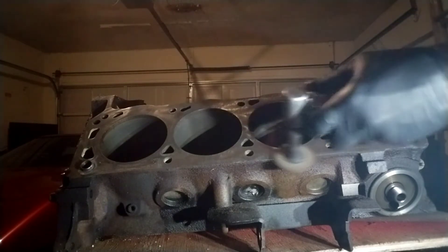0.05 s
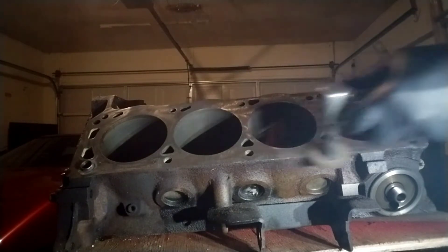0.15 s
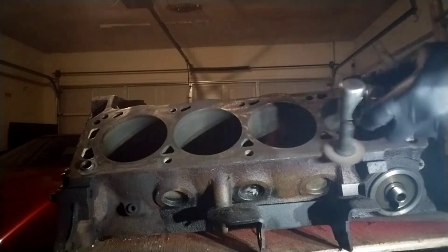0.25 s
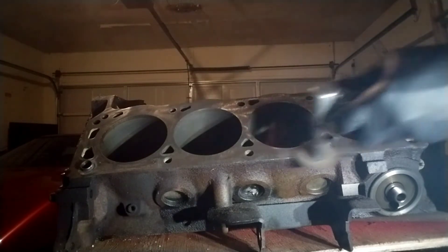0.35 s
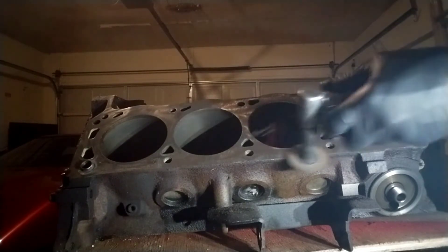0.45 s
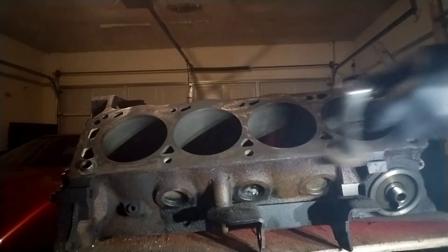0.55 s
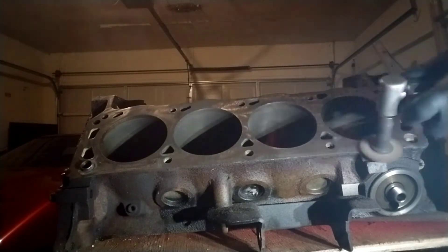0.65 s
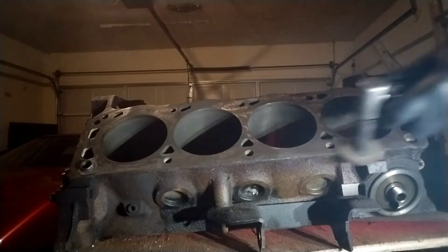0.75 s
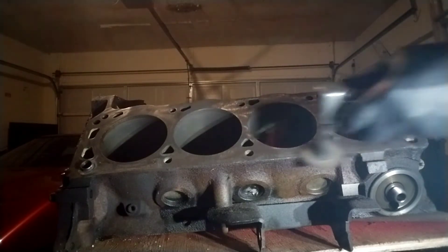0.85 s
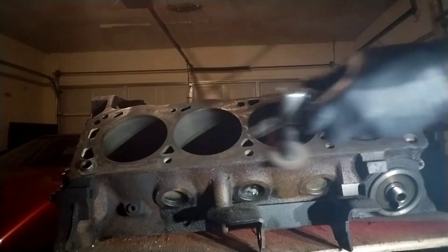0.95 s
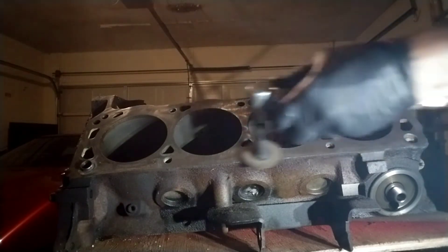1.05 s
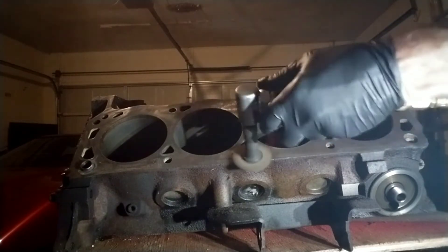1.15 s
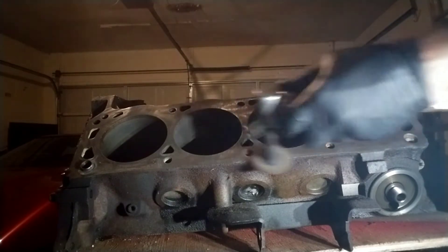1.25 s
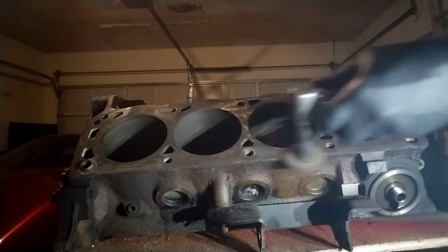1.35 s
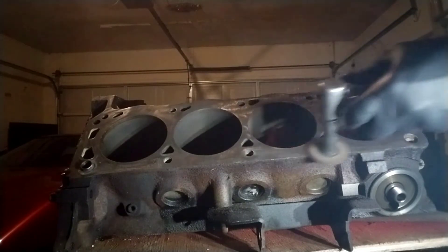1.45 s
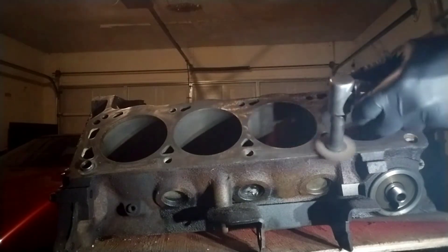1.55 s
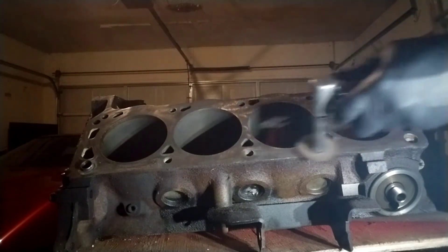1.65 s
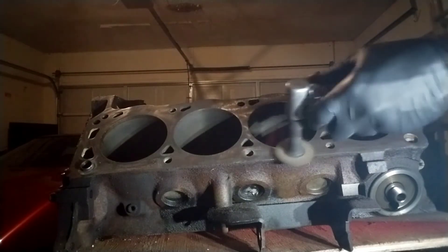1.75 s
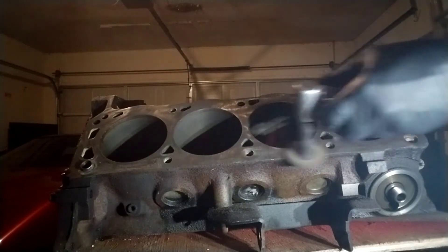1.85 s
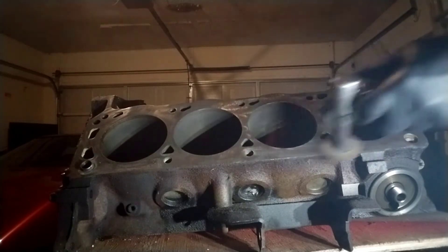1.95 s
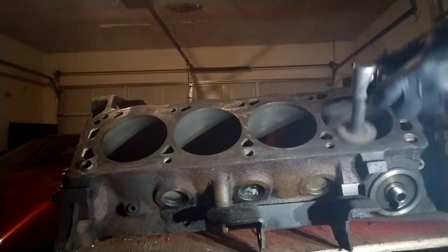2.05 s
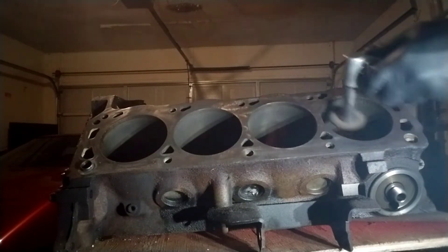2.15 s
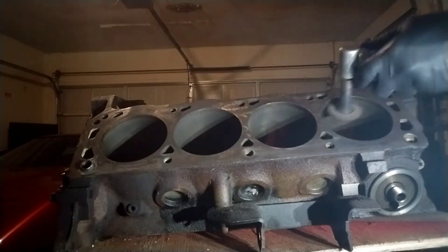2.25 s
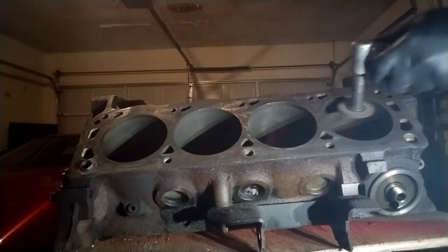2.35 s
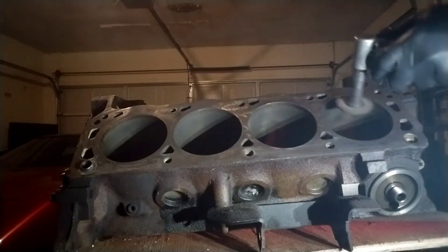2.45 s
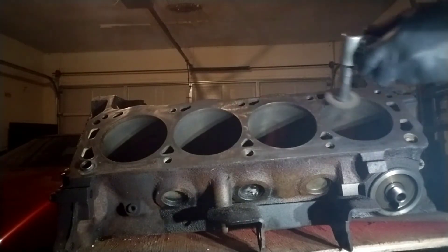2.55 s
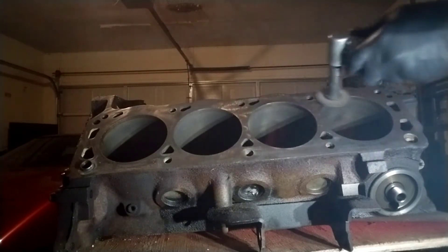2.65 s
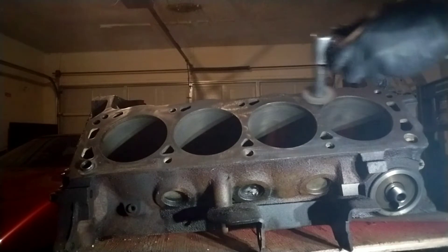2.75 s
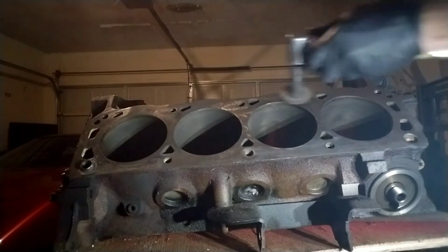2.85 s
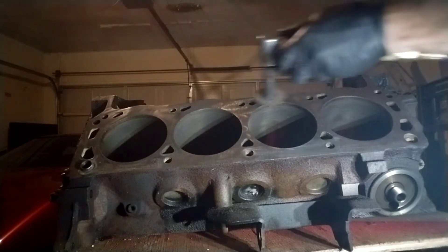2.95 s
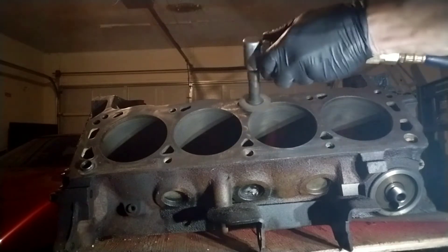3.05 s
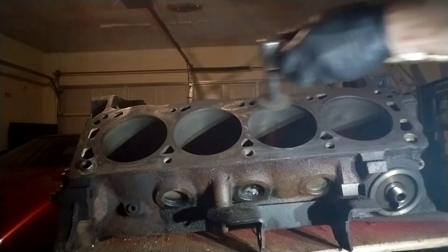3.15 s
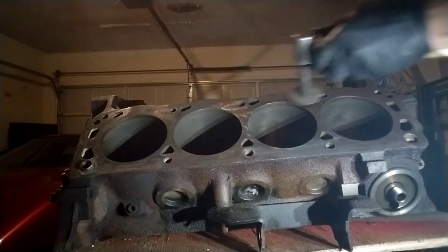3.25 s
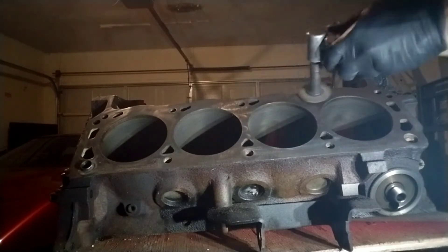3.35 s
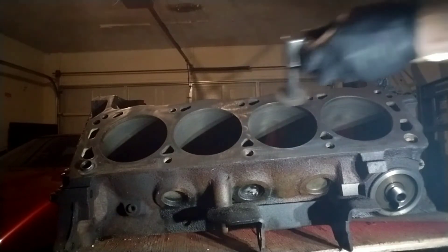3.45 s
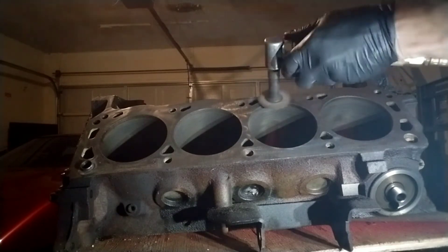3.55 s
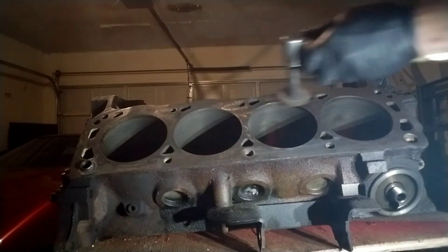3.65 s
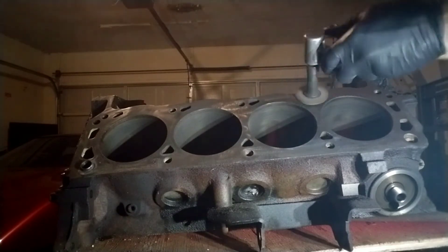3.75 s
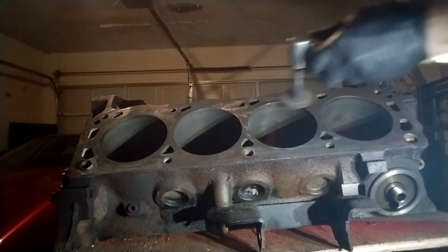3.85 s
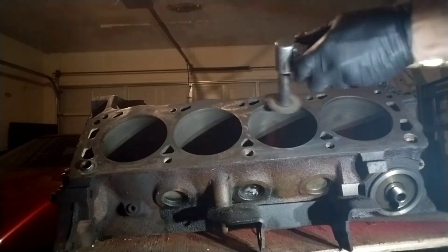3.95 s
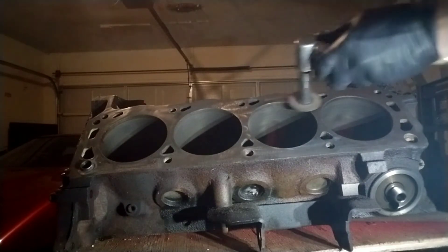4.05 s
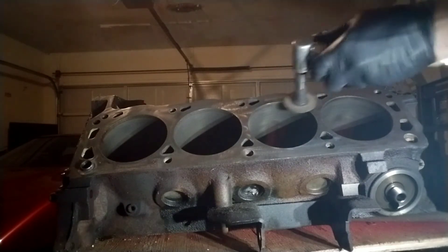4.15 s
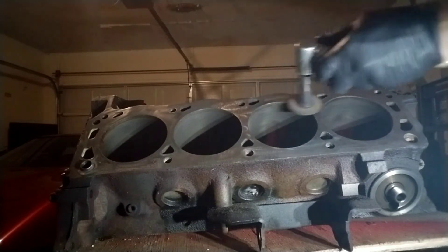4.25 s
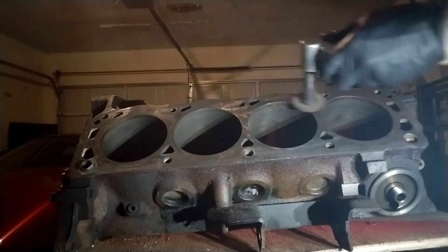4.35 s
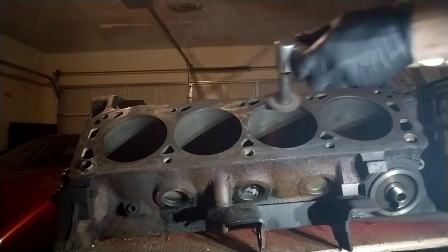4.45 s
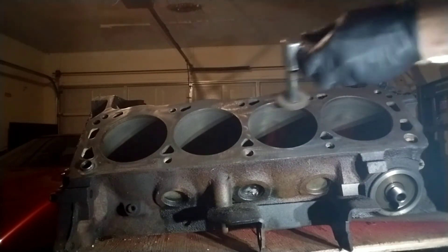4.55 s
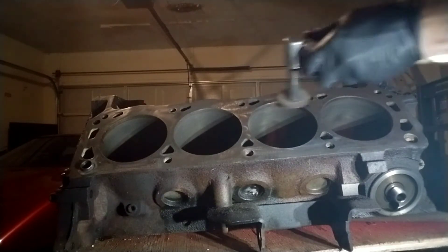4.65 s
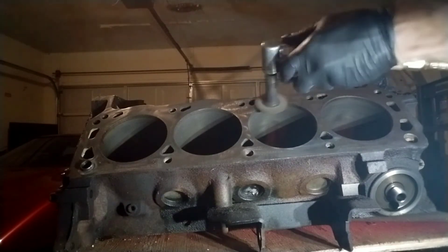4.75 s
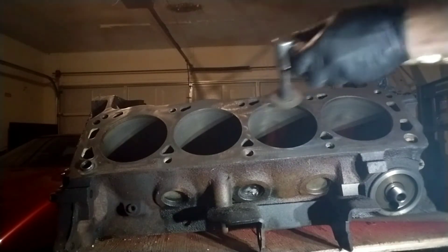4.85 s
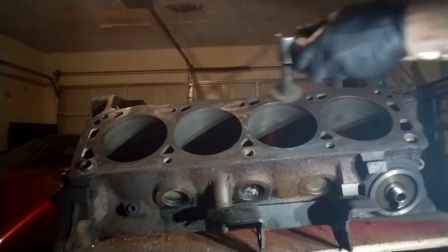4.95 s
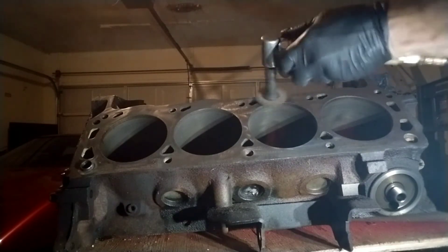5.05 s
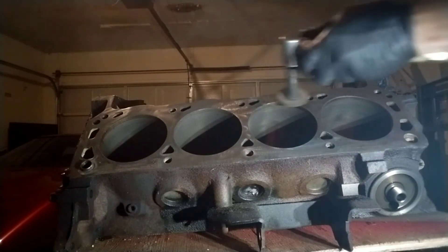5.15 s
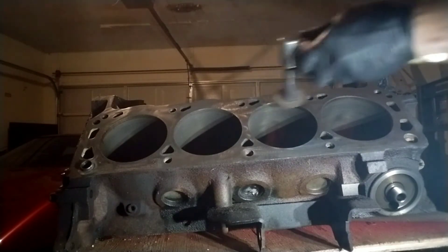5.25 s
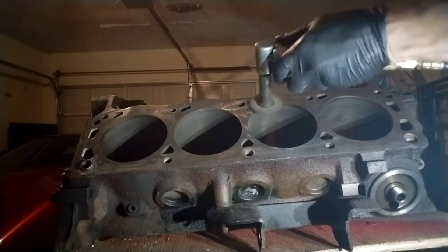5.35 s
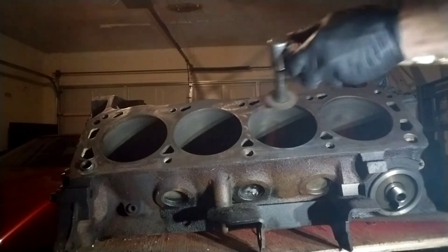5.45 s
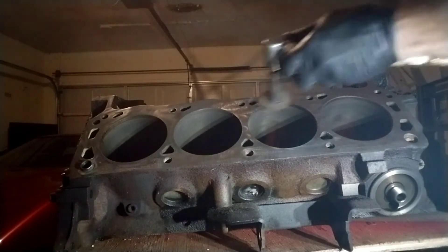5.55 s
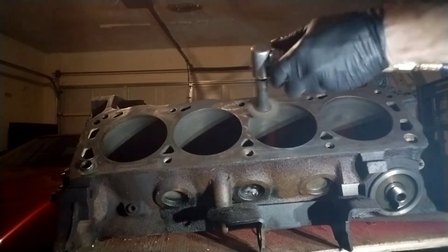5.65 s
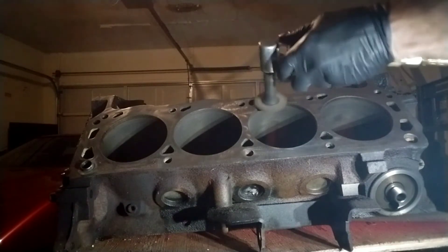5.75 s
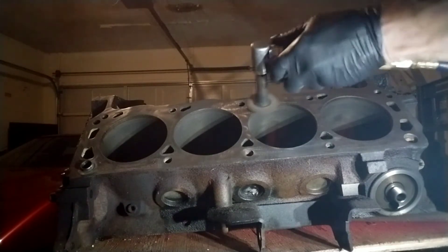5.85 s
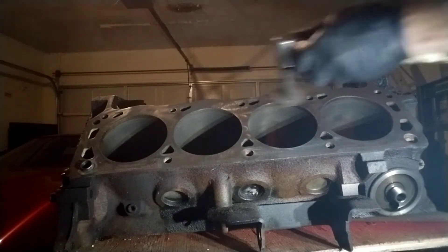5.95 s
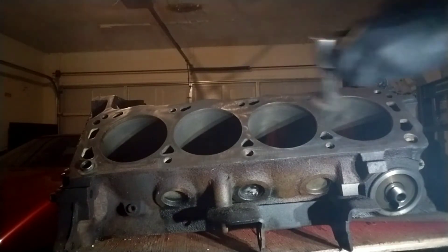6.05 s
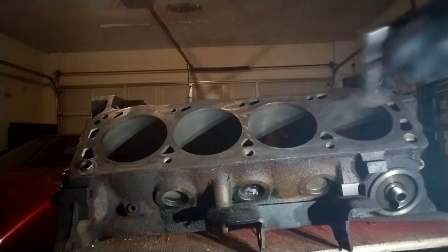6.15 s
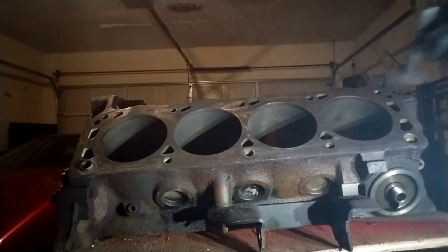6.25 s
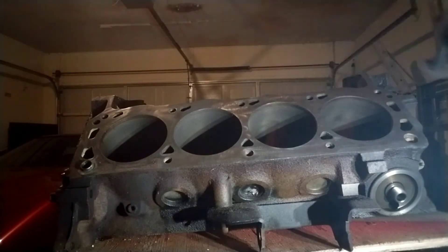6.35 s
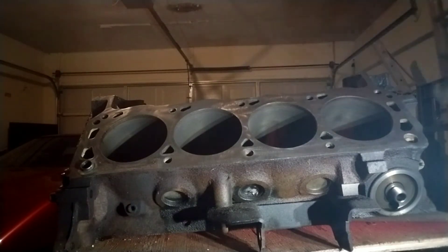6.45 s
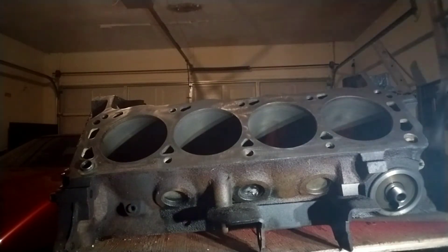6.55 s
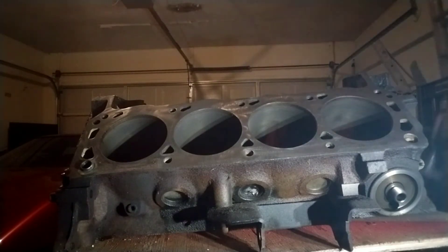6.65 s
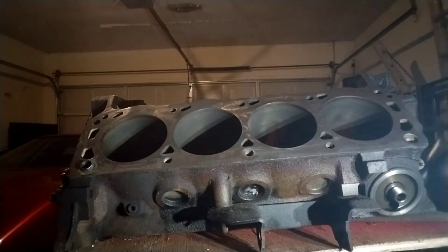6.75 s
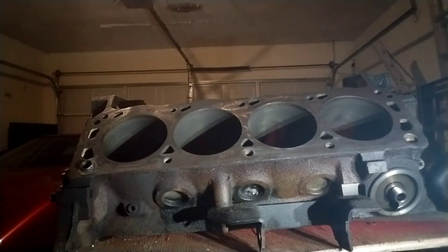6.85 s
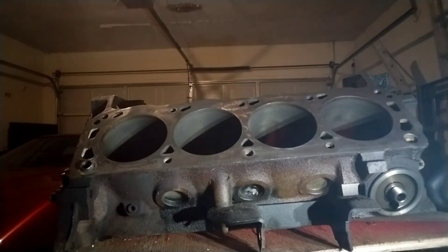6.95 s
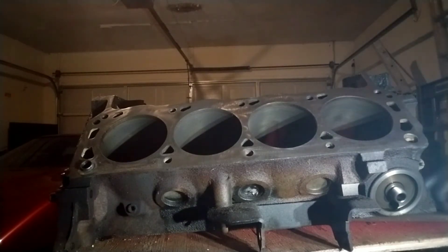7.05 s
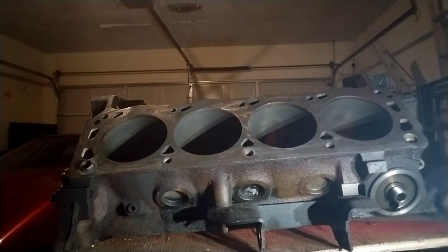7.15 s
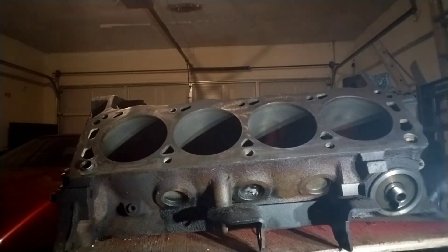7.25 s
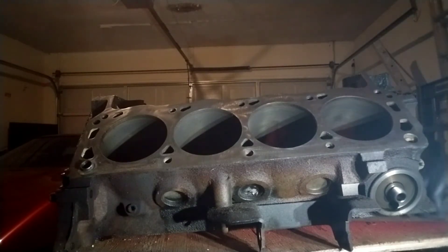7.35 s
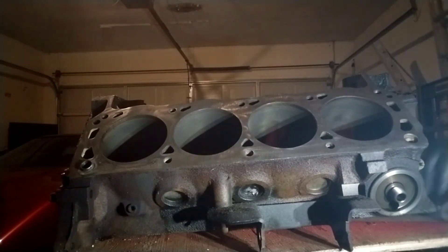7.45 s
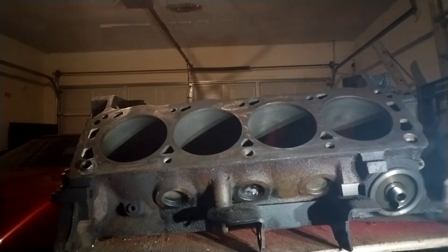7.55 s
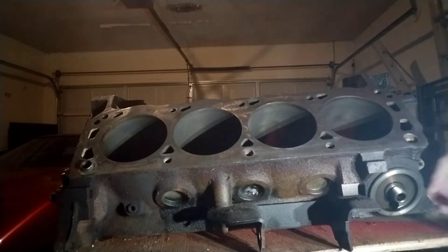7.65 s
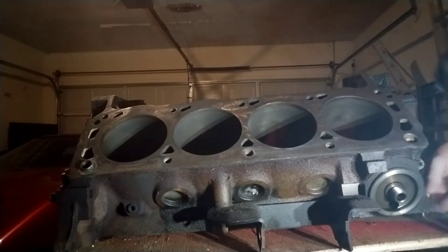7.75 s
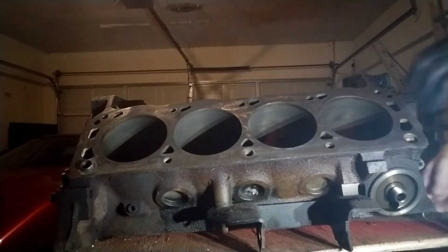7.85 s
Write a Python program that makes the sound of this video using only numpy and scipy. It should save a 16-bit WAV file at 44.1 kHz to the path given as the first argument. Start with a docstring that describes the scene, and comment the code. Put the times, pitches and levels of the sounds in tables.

```python
"""Die grinder on cast iron

An air die grinder with an abrasive disc scrubs an engine block in a garage, heard by two close ports.
The rotor whines as sines at multiples of its speed and sags under load; exhaust hiss and scraping
are shaped noise. The trigger is let go: the rotor slows, briefly speeds up, then runs down. The tool is
laid on a wooden bench: knocks ring decaying wood and steel modes, small bumps rattle, noise rustles."""
import sys
import numpy as np
from scipy import signal
from scipy.io import wavfile
from scipy.ndimage import uniform_filter1d

SR = 44100
rng = np.random.default_rng(int(sys.argv[2]) if len(sys.argv) > 2 else 0)


def to_wav(sig):
    """Store sig (one row per channel, or 1-D mono) as 16-bit WAV at the path in sys.argv[1].

    Samples outside -1..1 are clipped; the rate is SR.
    """
    pcm = np.clip(np.atleast_2d(sig), -1, 1) * 32767
    pcm = np.round(pcm).astype(np.int16)
    wavfile.write(sys.argv[1], SR, pcm.T)  # frames by channels


N = 348390  # samples
SIZE, HOP = 1024, 256  # spectral frame and step in samples

# The rotor under air pressure, slowed as the disc is pressed on, at chosen moments joined by half cosines.
# Each row: time in seconds, speed in Hz.
ROTOR_SPEED = [(0, 530), (.1, 521.5), (.28, 486), (.38, 513.7), (.48, 483.6), (.6, 500), (.86, 680),
               (.96, 706), (1.11, 648.4), (1.28, 577.6), (1.61, 638), (2.03, 577), (2.26, 785), (2.32, 727),
               (2.48, 780), (2.69, 799), (2.79, 722), (2.96, 598), (3.1, 614), (3.31, 551), (3.44, 615),
               (3.53, 623), (3.64, 653), (3.77, 586), (4.03, 614), (4.25, 567.5), (4.38, 566.5),
               (4.49, 589), (4.55, 573), (4.62, 590), (4.73, 558.3), (4.89, 575), (5.04, 551.3),
               (5.17, 593.6), (5.3, 537.4), (5.38, 538), (5.46, 571.6), (5.68, 533.2), (5.8, 527.6),
               (5.9, 536)]
# After the trigger is let go: the rotor slows, briefly speeds up, then runs down.
# Each row: time in seconds, speed in Hz, levels of orders 1, 2, 3 and 4 in dB.
AFTER_TRIGGER = [(5.92, 536.5, -17, -36, -34, -42), (5.956, 520, -22.5, -29, -33, -44),
                 (5.996, 458.4, -31, -32, -35, -42), (6.012, 429, -42, -34, -38, -45),
                 (6.028, 384.6, -35, -35, -40, -38), (6.056, 316.3, -35, -33, -29, -46),
                 (6.084, 253, -33, -33, -33, -44), (6.102, 206.6, -43, -52, -39, -40),
                 (6.114, 177.7, -46, -44, -31, -45), (6.16, 203, -45, -41, -33, -46),
                 (6.22, 236.7, -44, -40, -44, -45), (6.276, 258.5, -38, -32, -37, -36),
                 (6.306, 238.7, -41, -32.5, -44, -45), (6.35, 203.2, -52, -36, -47, -51),
                 (6.41, 161.7, -63, -44, -46, -50), (6.5, 116.4, -75, -68, -52, -55)]
# Ringing modes of the wooden bench top. Each row: frequency in Hz, level in dB, t60 in seconds.
BENCH_MODES = [(111, -13.5, 0.19), (180, -12, .12), (255, -2, 0.15), (323, 2.5, 0.068), (374, 12, 0.032),
               (504, 7.5, 0.025), (530, 4.5, 0.081), (576, -0.5, 0.045), (673, 7.5, 0.029),
               (848, -4.5, 0.044), (990, 8.5, 0.016), (1230, -3, .02), (1506, -5, 0.022), (1860, 6, 0.0093)]
# How alike the two ports hear a noise. Each row: frequency in Hz, likeness from 0 to 1.
LIKENESS = [(100, 0.9), (400, 0.68), (700, 0.78), (1200, 0.72), (2000, 0.62), (3000, 0.55), (4500, 0.3),
            (6000, 0.5), (8000, 0.5), (10000, 0.35), (14000, .3)]


def gain_of(db):
    """Amplitude factor of a level in dB."""
    return 10 ** (np.asarray(db) / 20)


def evened(x):
    """Scales a signal to rms 1."""
    return x / np.sqrt(np.mean(x ** 2) + 1e-20)


def read(points, hz):
    """Value of a spectrum table on a log-frequency axis."""
    f, value = np.transpose(points)
    return np.interp(np.log(hz + 1), np.log(f + 1), value)


def follow(rows, t):
    """Columns of a curve table at times t, joined by straight lines."""
    s, *columns = np.transpose(rows)
    return [np.interp(t, s, c) for c in columns]


def eased(rows, t):
    """Columns of a curve table at times t, joined by half cosines."""
    index = np.arange(len(rows))
    s, *columns = np.transpose(rows)
    place = np.interp(t, s, index)
    whole = np.floor(place)
    smooth = whole + (1 - np.cos(np.pi * (place - whole))) / 2
    return [np.interp(smooth, index, c) for c in columns]


def wander(seconds):
    """Smooth random drift of rms 1 on this time scale."""
    span = max(round(seconds * SR), 1)
    once = uniform_filter1d(rng.standard_normal(N), span)
    return evened(uniform_filter1d(once, span))


def wander_field(frames, bins, frame_span, bin_span):
    """Random field (bins x frames) of rms 1, smoothed over neighbouring frames and bins."""
    field = uniform_filter1d(rng.standard_normal((frames, bins)), frame_span, 0)
    return evened(uniform_filter1d(field, bin_span, 1)).T


def resonance(hz, centre_hz, width_hz):
    """Bell of height 1 over frequency, down to half at half its width either side."""
    return 1 / (1 + (2 * (hz - centre_hz) / width_hz) ** 2)


def moments(rows, t):
    """Sum of brief swells or dips in dB; each row: time in seconds, dB, half width in seconds."""
    return sum(db * np.exp(-((t - s) / half_s) ** 2) for s, db, half_s in rows)


def band_passed(x, low_hz, high_hz):
    """Keeps one band of a noise."""
    return signal.lfilter(*signal.butter(2, [low_hz, high_hz], "band", fs=SR), x)


def in_band(db, hz, lo_hz, hi_hz):
    """Scales each frame so that the band holds unit power."""
    inside = (hz > lo_hz) & (hz < hi_hz)
    return db - 10 * np.log10((gain_of(db) ** 2 * inside).sum(0))


def port_noise(db, lag_s):
    """Noise with the dB field (bins x frames); the ports share part of it, with a lag and phase between."""
    # Each row: frequency in Hz, phase by which the left port leads in radians.
    port_phase = [(0, 0), (1800, -.3), (2150, .5), (2600, -.9), (3200, -.2), (6300, -1.3), (6900, -2.9),
                  (7700, -.8), (8600, .8), (9900, 6.7), (10700, 4.8), (14500, 3.5)]
    # Each row: frequency in Hz, left minus right level in dB.
    port_balance = [(60, 1.5), (240, -1.5), (930, -0.5), (3640, 2), (14300, 3.5)]
    hz = np.fft.rfftfreq(SIZE, 1 / SR)[:, None]
    a, b, c, d = rng.standard_normal((db.shape[1], len(hz), 4)).T
    right, apart = a + 1j * b, c + 1j * d
    like = np.clip(read(LIKENESS, hz), 0, 1)
    half = gain_of(read(port_balance, hz) / 2)
    turn = np.exp(1j * (read(port_phase, hz) - 2 * np.pi * hz * lag_s))
    left = like * turn * right + np.sqrt(1 - like ** 2) * apart
    z = np.array([left * half, right / half]) * gain_of(db)
    noise = signal.istft(z, nperseg=SIZE, noverlap=SIZE - HOP)[1][:, :N]
    return noise * 1.165  # makes up most of the level lost where frames overlap


def garage(x):
    """Reverberation: sparse taps of random sign, one in every 20 samples, each band dying at its own speed."""
    # Decay of the room. Each row: frequency in Hz, t60 in seconds.
    room_decay = [(100, 0.74), (300, 0.74), (800, 0.61), (2000, 0.54), (6000, 0.16), (12000, 0.17)]
    taps = np.zeros((2, SR))
    at = np.arange(200, SR - 20, 20) + rng.integers(0, 20, (2, (SR - 201) // 20))
    np.put_along_axis(taps, at, rng.choice([-1., 1.], at.shape), 1)
    hz, t, z = signal.stft(taps, SR, nperseg=512)
    like = np.clip(read(LIKENESS, hz), 0, 1)[:, None]  # close ports share the bass
    z = np.array([z[0], like * z[0] + np.sqrt(1 - like ** 2) * z[1]])
    decay = gain_of(-60 * t / read(room_decay, hz)[:, None])
    tail = signal.istft(z * decay, SR, nperseg=512)[1]
    tail = tail / np.linalg.norm(tail[0])
    return signal.fftconvolve(x[None], tail, axes=1)[:, :N]


def stillness():
    """The still garage: noise with a steady spectrum, a low hum under faint hiss."""
    # Each row: frequency in Hz, density in dB per Hz.
    quiet_spectrum = [(15, -36), (25, -12), (114, -2), (138, -7.5), (175, -40), (508, -29), (1400, -19),
                      (1800, -15), (1930, -6), (2100, -14), (3400, -20), (4100, -14.5), (9700, -28),
                      (14600, -31)]
    hz = np.fft.rfftfreq(SIZE, 1 / SR)[:, None]
    steady_db = read(quiet_spectrum, hz) * np.ones(N // HOP + 5)
    return gain_of(-57) * evened(port_noise(steady_db, 0))


def bench(weights):
    """Ring of the wooden top, each mode scaled by how the blow reaches it; neighbours swing opposite ways."""
    t = np.arange(SR // 3) / SR
    ring = np.zeros(len(t))
    for k, (weight, (hz, db, t60)) in enumerate(zip(weights, BENCH_MODES)):
        ring += (-1) ** k * weight * gain_of(db - 60 * t / t60) * np.sin(2 * np.pi * hz * t)
    ring = ring * (1 - np.exp(-t / 0.00075))  # the blow takes a moment to land
    return ring / abs(ring).max()


def rattle():
    """The tool settling: many small soft bumps ring the bench, with noise for the rustle of glove and hose."""
    # Each row: time in seconds, level of the bumps in dB, level of the rustle in dB.
    settling = [(6.97, -33, -37), (7.02, -41, -47.5), (7.152, -57, -54), (7.306, -44, -51.5),
                (7.345, -46, -57), (7.43, -50, -58), (7.502, -38, -51), (7.626, -37, -51.5),
                (7.78, -31.5, -46.5), (7.9, -46, -51)]
    t = np.arange(N) / SR
    bumps_db, rustle_db = follow(settling, t)
    sizes = gain_of(2.7 * np.minimum(rng.exponential(1, N), 4))
    struck = rng.random(N) < 300 / SR  # about 300 bumps a second
    bumps = sizes * struck * rng.choice([-1., 1.], N)
    soft_ring = signal.fftconvolve(bench(np.ones(len(BENCH_MODES))), np.hanning(12))
    rumble = evened(signal.fftconvolve(bumps, soft_ring)[:N])
    rustle = band_passed(rng.standard_normal((2, N)), 2000, 9400)
    rustle = evened(rustle * gain_of(2.5 * wander(.012)))  # the rustle comes and goes
    mix = gain_of(bumps_db) * rumble + gain_of(rustle_db) * rustle
    return mix * (t > settling[0][0])


def knocks():
    """Each blow on the bench rings the modes near its region, with a crack of wood and a click of metal."""
    # Each row: start in seconds, thud in dB, pitch region struck in Hz, its width in octaves,
    # crack in dB, metal click in dB.
    blows = [(6.961, -25.5, 690, 1.1, -30, -32), (6.965, -30, 700, 0.98, -34, -33),
             (7.04, -34, 500, 1, -50, -50), (7.177, -29, 500, 2.9, -50, -57),
             (7.184, -28, 600, 4, -48, -58), (7.196, -26, 1200, 2, -48, -56),
             (7.215, -36, 1400, .8, -50, -58), (7.235, -34, 500, 1, -55, -60),
             (7.254, -29, 500, 3.5, -40, -50), (7.29, -38, 450, 0.78, -40, -50),
             (7.306, -33, 700, 0.91, -37, -51), (7.446, -14.5, 360, 0.15, -52, -44),
             (7.455, -13, 338, 0.56, -52, -31.5), (7.468, -15.5, 354, 0.59, -62, -55),
             (7.488, -9.5, 980, 1.06, -30, -46), (7.494, -18, 550, 0.92, -45, -53),
             (7.5, -12.5, 555, 1.3, -46, -48), (7.514, -20, 600, 0.63, -57, -58),
             (7.536, -19, 450, 0.69, -57, -60), (7.548, -24, 600, 0.61, -50, -60),
             (7.64, -25, 392, 0.99, -44, -60), (7.668, -24, 600, 0.92, -46, -60),
             (7.7, -31, 1400, 0.5, -44, -58), (7.727, -22, 400, 0.93, -55, -60),
             (7.752, -21, 685, 0.5, -28, -38), (7.773, -32, 470, 0.49, -51, -56)]
    # Ringing modes of the tool's steel body. Each row: frequency in Hz, level in dB, t60 in seconds.
    steel_modes = [(2380, -14, 0.025), (2940, -12, .03), (4070, -13, 0.053), (4760, -8, .03),
                   (6700, 9.5, 0.025), (7320, 7, 0.037), (8010, 10.5, 0.019), (8540, 1, .025),
                   (11400, -12, 0.023), (13500, -8, .03)]
    out, t = np.zeros(N + SR), np.arange(SR // 3) / SR
    noise = rng.standard_normal((len(blows), 2, len(t)))
    modes_hz = np.transpose(BENCH_MODES)[0]
    steel = np.array([gain_of(db - 60 * t / t60) * np.sin(2 * np.pi * hz * t) for hz, db, t60 in steel_modes])
    # a blow reaches the steel modes unevenly, by 3 dB rms
    reach = gain_of(-3 + 3 * rng.standard_normal((len(blows), len(steel_modes)))) / 2
    rise = 1 - np.exp(-t / 0.00092)
    for row, (wood_noise, metal_noise), ring in zip(blows, noise, reach @ steel):
        s, thud_db, hz, octaves, crack_db, click_db = row
        thud = bench(np.exp(-(np.log2(modes_hz / hz) / octaves) ** 2))
        crack = evened(band_passed(wood_noise, 1500, 4200)) * np.exp(-t / 0.0043)
        click = evened(band_passed(metal_noise, 4500, 10000)) * np.exp(-t / 0.0032)
        sharp = gain_of(crack_db) * crack + gain_of(click_db) * (click + ring)
        at = round(s * SR)
        out[at:at + len(t)] += gain_of(thud_db) * thud + rise * sharp
    return out[:N]


def casting_rings(hz, t):
    """Resonances of the iron block in dB, which swell and shrink slightly at random."""
    # Resonances and the dips between them. Each row: frequency in Hz, width in Hz, height in dB.
    casting = [(940, 85, 2), (1884, 120, 7.5), (1200, 185, -3.5), (2200, 190, -2.5), (2710, 530, 6),
               (3430, 410, 4)]
    swells = 1 + .08 * wander_field(len(t), len(casting), 25, 1)
    return sum(db * swell * resonance(hz, f, width) for (f, width, db), swell in zip(casting, swells))


def hiss_colour(hz, t):
    """Spectrum of air and scraping in dB, ringing the casting and combed by the echo off its face."""
    # Under air pressure. Each row: frequency in Hz, density in dB per Hz.
    driven_spectrum = [(110, -66), (180, -28.5), (318, -27.5), (404, -1.5), (495, -13.5), (573, -6),
                       (756, -8.5), (1090, -4), (1220, -6.5), (1610, -2.5), (3480, -7), (4100, -5.5),
                       (7810, -4), (13300, -11), (14600, -22.5)]
    # With the air shut off. Each row: frequency in Hz, density in dB per Hz.
    released_spectrum = [(24, -69), (40, -39.5), (155, -26), (237, -22), (439, -6.5), (484, -2.5),
                         (990, -2), (1370, -14), (1930, -10), (2450, -8), (3300, -13.5), (4400, -12),
                         (7140, -18.5), (9840, -24), (12900, -21), (14600, -31)]
    # A broad bump or hollow in the hiss shifts in pitch.
    # Each row: time in seconds, centre in Hz, height in dB.
    shifting_bump = [(0, 6960, -3), (.3, 5750, 7.5), (.65, 5600, 3.5), (.95, 6900, 0), (1.4, 6940, 4),
                     (1.55, 5500, 2), (1.85, 7220, -1), (2.7, 7610, -1.5), (3.1, 6595, 6),
                     (3.35, 8450, 1.5), (5.2, 8700, -2), (5.5, 6500, 5), (5.95, 6360, 4), (6.25, 4370, -7),
                     (6.42, 4405, 11), (6.6, 4380, 1)]
    # Steady dips and bumps in the treble. Each row: frequency in Hz, width in Hz, height in dB.
    hiss_bumps = [(4980, 570, -4), (9720, 780, -4.5), (11400, 1300, -1)]
    # Echo off the block's face. Each row: time in seconds, strength from 0 to 1.
    face_echo = [(0, 0.07), (2, 0.15), (3, 0.08), (4.5, 0.1)]
    echo_s = 0.566 / 1000  # extra path by way of the face
    # bass grows as the rotor is slowed: full below 280 Hz, none above 380 Hz
    load_bass = -51 * np.log2(eased(ROTOR_SPEED, t)[0] / 600) * np.clip((380 - hz) / 100, 0, 1)
    rings = casting_rings(hz, t) + load_bass
    released_hz = follow(AFTER_TRIGGER, t)[0]
    # pressure falls with the lowest speed reached so far
    driven = np.clip((np.minimum.accumulate(released_hz) - 250) / 230, 0, 1)
    db = driven * (read(driven_spectrum, hz) + rings) + (1 - driven) * read(released_spectrum, hz)
    centre_hz, height_db = follow(shifting_bump, t)
    db = db + height_db * resonance(hz, centre_hz, 800)
    db = db + sum(bump_db * resonance(hz, f, width) for f, width, bump_db in hiss_bumps)
    strength = np.clip(follow(face_echo, t)[0], 0, .8)
    return db + 20 * np.log10(abs(1 + strength * np.exp(-2j * np.pi * hz * echo_s)))


def hiss():
    """Exhaust air and the disc's scraping: noise levelled in three bands, uneven in time and pitch."""
    # Under pressure. Each row: time in seconds, level of the exhaust in dB, level of the top treble in dB.
    air_levels = [(0, -22, -32), (.33, -23, -30), (.55, -22.5, -31), (.71, -20.5, -28.5), (.86, -20.5, -25),
                  (1.05, -20, -28), (1.37, -20.5, -29), (1.63, -22.5, -26.5), (1.85, -22, -31),
                  (2.05, -24.5, -30.5), (2.45, -21.5, -32), (2.93, -22, -30.5), (3.16, -22, -32.5),
                  (3.3, -22, -29), (3.65, -22, -30.5), (4.47, -22, -31), (4.9, -24.5, -34),
                  (5.51, -24.5, -35), (5.9, -22.5, -34.5)]
    # Fall after the trigger. Each row: time in seconds, change of exhaust, top treble and scraping in dB.
    shut_off = [(5.92, 1, 5, 6.5), (6.03, -3, 1.5, 2), (6.16, -15, -8, -6), (6.34, -17, -11, -4),
                (6.52, -22, -10.5, -11), (6.62, -26, -22, -18.5), (6.8, -30.5, -26, -28),
                (6.92, -35, -36, -36)]
    # The tool moves sideways, at chosen moments joined by half cosines.
    # Each row: time in seconds, ms by which the left port hears it later.
    sideways = [(0, -0.079), (.3, 0.033), (.5, 0.0069), (.75, 0.024), (1.05, -0.057), (1.37, -0.076),
                (1.56, 0.027), (1.85, -0.037), (2.5, 0.086), (3.12, -0.013), (3.37, 0.035), (3.62, -0.0017),
                (3.85, 0.042), (4, -0.0028), (4.37, 0.02), (4.87, -0.0057), (5.8, -0.035), (6.4, 0.12)]
    hz, t = np.fft.rfftfreq(SIZE, 1 / SR)[:, None], np.arange(N // HOP + 5) * HOP / SR
    air_db, top_db = follow(air_levels, t)
    air_fall, top_fall, scrape_fall = follow(shut_off, t)
    # scraping grows 3 dB per octave of speed
    scrape_db = -30.5 + 3 * np.log2(eased(ROTOR_SPEED, t)[0] / 600)

    colour = hiss_colour(hz, t)
    low, high = np.clip((5200 - hz) / 800, 0, 1), np.clip((hz - 9000) / 1500, 0, 1)
    scrape = in_band(colour, hz, 1300, 4500) + scrape_db + scrape_fall
    exhaust = in_band(colour, hz, 5000, 9500) + air_db + air_fall
    top = in_band(colour, hz, 10000, 14000) + top_db + top_fall
    db = low * scrape + (1 - low - high) * exhaust + high * top

    patches = wander_field(len(t), len(hz), 14, 10)
    flicker = wander_field(len(t), len(hz), 1, 150)  # quick random flicker over wide bands
    streaks = wander_field(len(t), len(hz), 18, 2)  # narrow bands of hiss come and go
    db = db + 1.1 * patches + 0.63 * flicker + 2.2 * streaks
    db = db - 200 * np.maximum(t - shut_off[-1][0], 0)  # dies at 200 dB a second at the end
    rasp = gain_of(0.68 * wander(0.0021))  # quick uneven bite of the grit
    return rasp * port_noise(db, eased(sideways, t)[0] / 1000)


def driven_orders(hz, t):
    """Levels in dB of orders 1 to 4 under pressure, set by how tool and block radiate each pitch."""
    # Order 1. Each row: pitch in Hz, level in dB.
    first_order = [(480, -24.5), (540, -25), (580, -22.5), (620, -25), (660, -21), (710, -26), (750, -28),
                   (800, -28.5)]
    # Orders 2 and 3. Each row: pitch in Hz, level in dB.
    overtones = [(900, -41), (980, -30.5), (1030, -35.5), (1080, -36), (1150, -39.5), (1210, -48),
                 (1270, -38), (1350, -31), (1450, -34), (1600, -33.5), (1750, -45), (1900, -40),
                 (2100, -92)]
    # Order 4. Each row: pitch in Hz, level in dB.
    fourth_order = [(2400, -48), (2800, -45), (3100, -36)]
    # Order 1 dips briefly. Each row: time in seconds, depth in dB.
    dips = [(1.16, -5), (1.49, -5.5), (1.56, -10), (1.7, -20), (2.19, -8), (2.33, -10), (2.65, -26),
            (2.79, -10), (3.3, -17), (4.155, -2), (4.465, -1), (4.721, -10), (5.02, -9), (5.43, -4),
            (5.52, -7), (5.87, -11)]
    # Orders 2 and 3 sink or swell for a while. Each row: time in seconds, dB, half width in seconds.
    overtone_fades = [(.04, -13, 0.09), (.39, -8, 0.036), (.7, 5, .06), (2.8, 3, .08), (3.8, 4, 0.17),
                      (5.3, 4, 0.07), (5.45, -3, 0.04), (5.8, 2.5, 0.15)]
    dips_db = moments([(s, db, 0.019) for s, db in dips], t)
    fades_db = moments(overtone_fades, t)
    first_db = read(first_order, hz) + dips_db + 1.8 * wander(0.018)  # random flutter
    middle_db = [read(overtones, k * hz) + fades_db for k in (2, 3)]
    return [first_db] + middle_db + [read(fourth_order, 4 * hz)]


def whine():
    """Orders of the rotor's unbalance: sines at multiples of a slightly wobbling speed, wavering in level."""
    # Weaker orders: quarter orders, perhaps from a shaft geared down four to one, and halves.
    # Each row: multiple of the speed, level relative to order 1 in dB.
    minor_orders = [(.75, -26), (1.249, -33), (1.5, -28), (2.5, -21.5), (3.75, -38), (5.5, -41)]
    t = np.arange(N) / SR
    driven = t < AFTER_TRIGGER[0][0]
    released_hz, *released_db = follow(AFTER_TRIGGER, t)
    hz = uniform_filter1d(np.where(driven, eased(ROTOR_SPEED, t)[0], released_hz), size=400)
    pairs = zip(driven_orders(hz, t), released_db)
    orders_db = [uniform_filter1d(np.where(driven, a, b), size=400) for a, b in pairs]
    # loose vanes chatter once the trigger is let go
    chatter_db = 3.5 * uniform_filter1d(1. - driven, size=2000)
    orders_db = [db - chatter_db / 2 + chatter_db * wander(.007) for db in orders_db]

    turns = np.cumsum(hz * (1 + 0.0027 * wander(0.011))) / SR
    first_gain = gain_of(orders_db[0])
    tone = first_gain * np.sin(2 * np.pi * turns)
    for k, db in enumerate(orders_db[1:], start=2):
        waver_db = 2.2 * wander(.035)
        blur = .25 * wander(0.015)  # phase wander in radians
        tone = tone + gain_of(db + waver_db) * np.sin(2 * np.pi * k * turns + blur)
    for k, db in minor_orders:
        tone = tone + first_gain * gain_of(db) * np.sin(2 * np.pi * (k * turns + rng.random()))
    fade_out = np.clip((AFTER_TRIGGER[-1][0] - t) / .05, 0, 1)
    return np.sqrt(2) * tone * fade_out  # root 2 makes the order levels rms


def scene():
    """Tone and knocks reach the ports directly and by way of the garage; the other layers add to them."""
    tone, blows = whine(), knocks()
    ports = np.array([np.roll(tone, 3), tone])  # the left port is a little farther from the tool
    near = ports * gain_of([[.4], [-.4]]) + blows * gain_of([[.2], [-.2]])
    far = garage(gain_of(-16) * tone + gain_of(-8) * blows)
    return near + far + hiss() + rattle() + stillness()


def record(dry):
    """The bass is thinned when the treble is loud, by a randomly varied corner; a low-pass limits the band."""
    hz, t, z = signal.stft(dry, SR, nperseg=2048, noverlap=1536, boundary="even")
    treble_power = (abs(z[:, hz > 2000]) ** 2).sum(1).mean(0)
    treble_db = uniform_filter1d(10 * np.log10(treble_power + 1e-12), 5)
    variation = evened(uniform_filter1d(rng.standard_normal(len(t)), size=7))
    corner_hz = np.interp(treble_db, [-42, -30, -25], [50, 80, 300]) * np.exp(.2 * variation)
    low_cut = 1 / np.sqrt(1 + (corner_hz / (hz[:, None] + 1)) ** 18)
    low_cut = np.maximum(low_cut, gain_of(-17.0))  # takes away 17 dB at most
    passed = signal.istft(z * low_cut, SR, nperseg=2048, noverlap=1536)[1][:, :N]
    band_limit = signal.firwin(511, 14650, window=("kaiser", 9), fs=SR)
    return signal.oaconvolve(passed, band_limit[None], "same")


dry = scene()
out = record(dry)
to_wav(out)
```